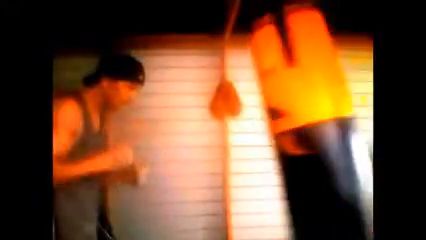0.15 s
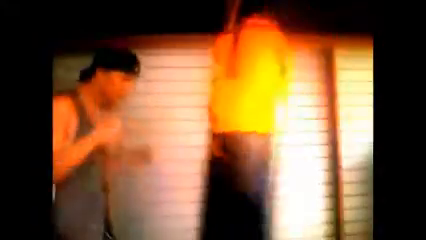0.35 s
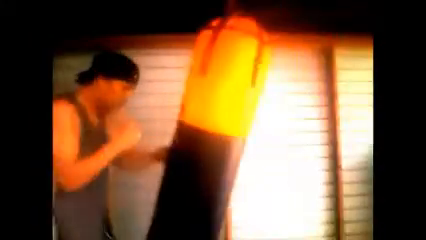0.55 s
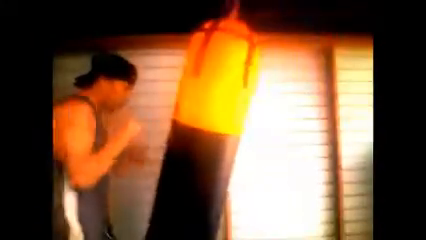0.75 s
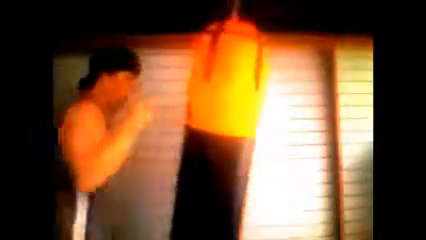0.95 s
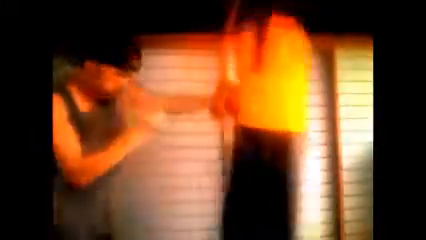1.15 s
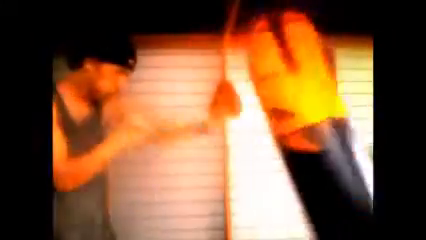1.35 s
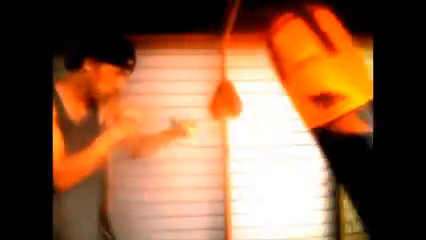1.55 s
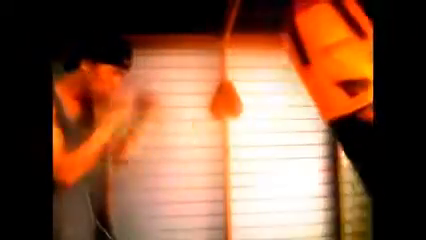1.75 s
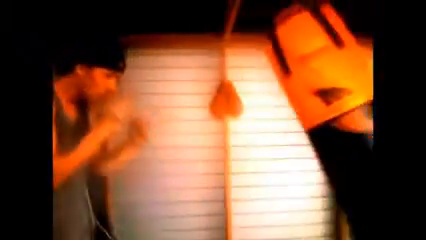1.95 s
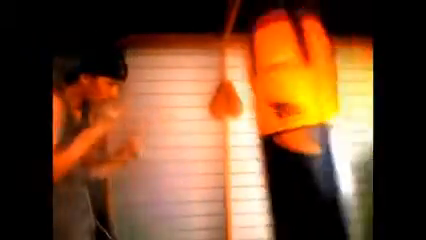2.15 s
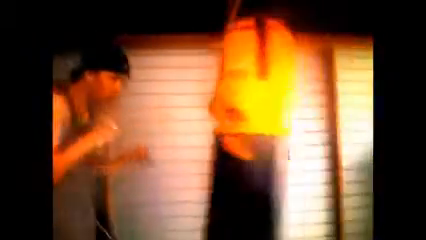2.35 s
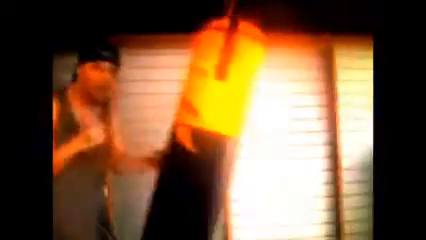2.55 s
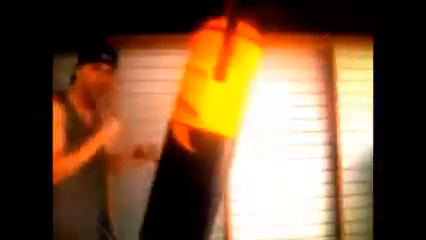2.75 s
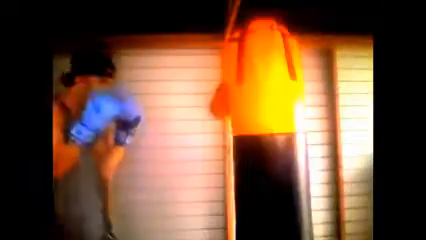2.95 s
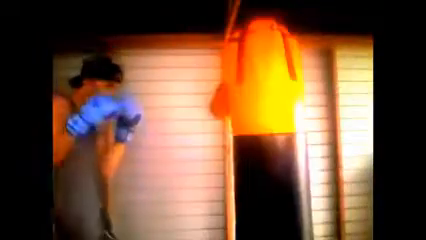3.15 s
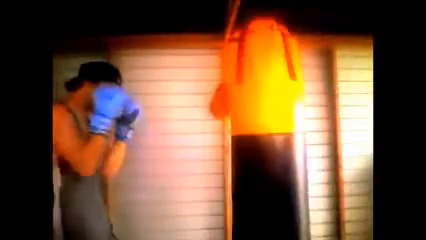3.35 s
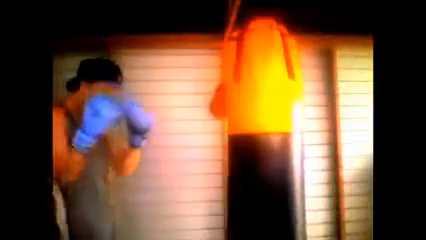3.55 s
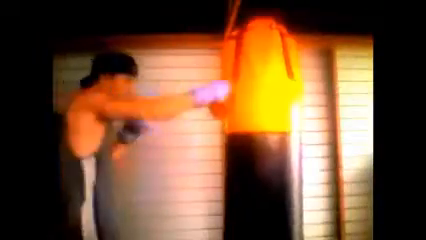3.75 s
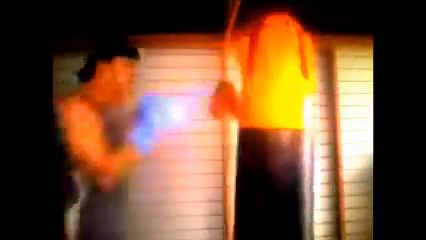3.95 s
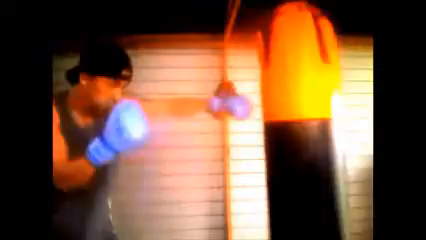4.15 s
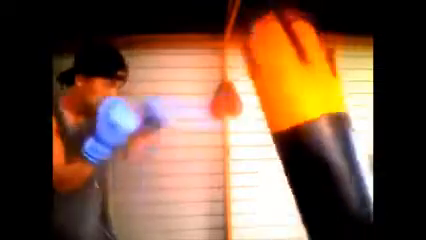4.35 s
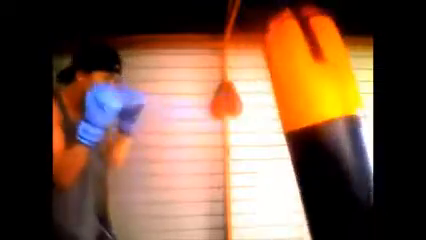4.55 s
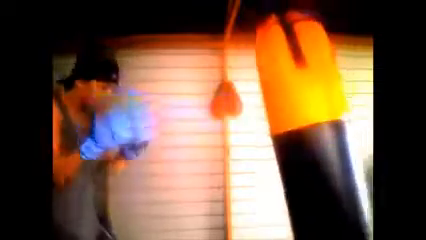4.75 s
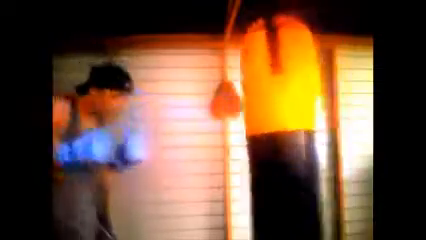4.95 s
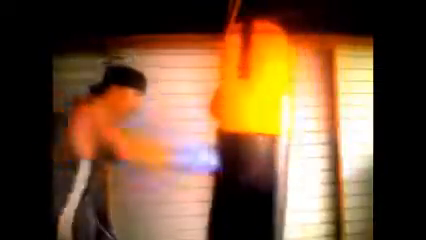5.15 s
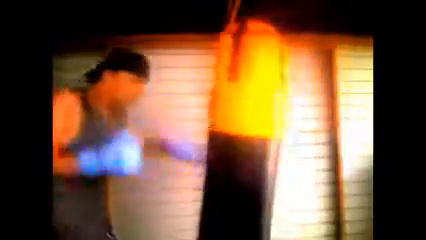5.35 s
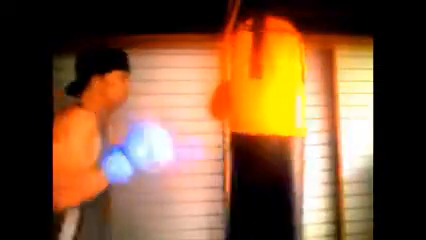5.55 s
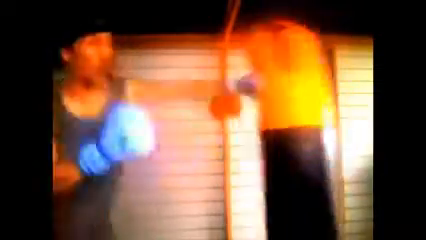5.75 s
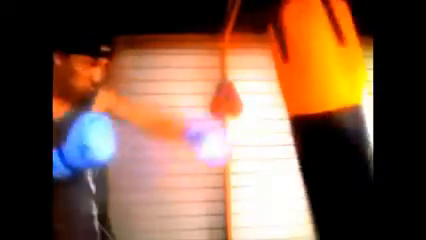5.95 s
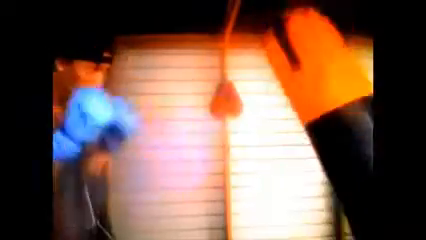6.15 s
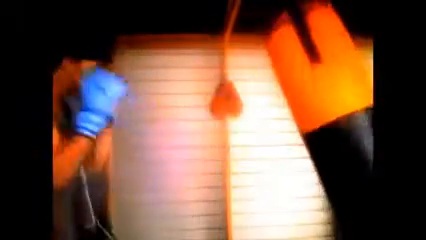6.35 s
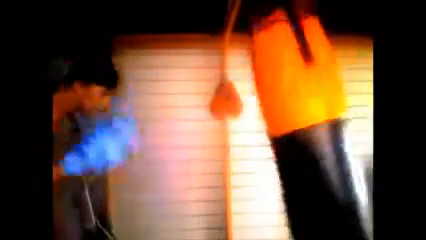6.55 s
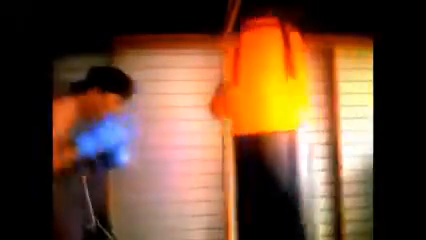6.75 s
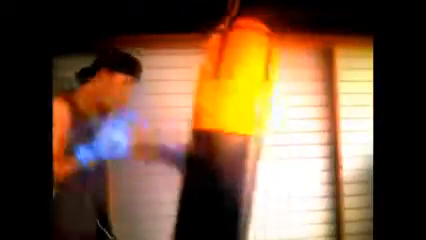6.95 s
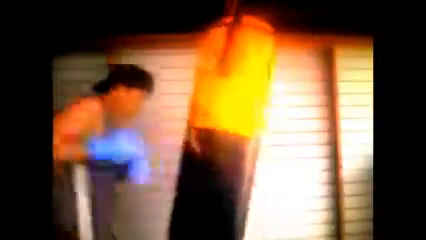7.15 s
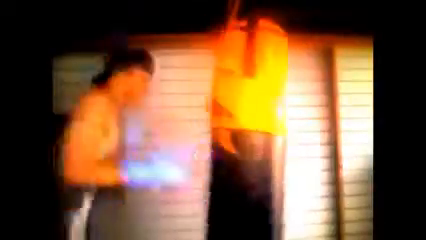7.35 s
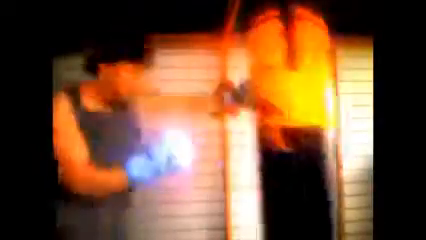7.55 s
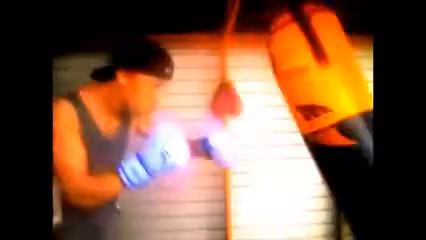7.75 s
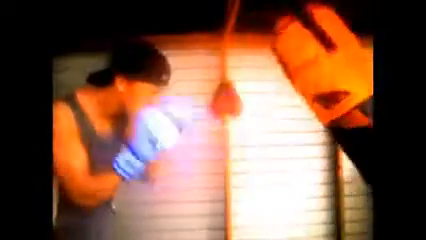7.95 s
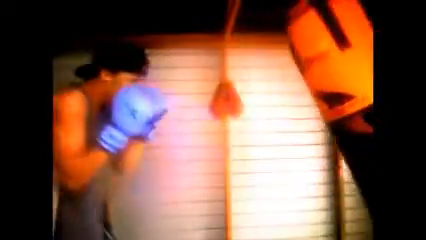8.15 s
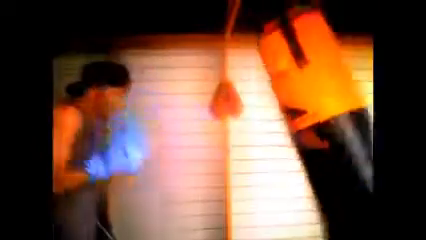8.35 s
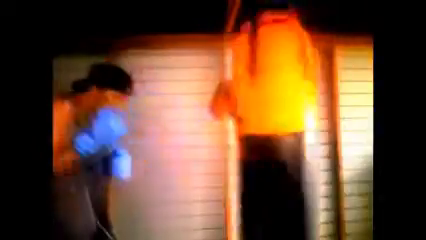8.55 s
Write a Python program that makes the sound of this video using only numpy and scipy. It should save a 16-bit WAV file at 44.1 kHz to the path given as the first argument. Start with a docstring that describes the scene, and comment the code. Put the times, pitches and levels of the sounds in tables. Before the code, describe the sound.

Sharp leather punches with deep booms jolt a heavy bag on its clattering chain; the sound suddenly drops midway, then gradually climbs back.

```python
"""Shoes scuff concrete in a garage, then gloves hit a hanging heavy bag: noise slaps, each with a deep sine boom.
After each blow the bag bounces on its chain, which rattles and clinks as coloured grains and noise.
About 2 s and again 5 s in, the hook squeaks faintly: narrow noise on a gliding pitch.
At 3 s the level drops suddenly and climbs back until 7.3 s, through a low room murmur, more flurries and
dull knocks of bag and hanger. Throughout, air is heard, and a shrill microphone overloads on hard punches."""
import sys
import numpy as np
from scipy import signal
from scipy.fft import rfft, irfft, next_fast_len
from scipy.io import wavfile
from scipy.ndimage import uniform_filter1d

SR = 44100
rng = np.random.default_rng(int(sys.argv[2]) if len(sys.argv) > 2 else 0)


def bounce(signal):
    """Save signal as a 16-bit WAV file at the path given by the first command-line argument."""
    frames = np.transpose(np.atleast_2d(signal))
    limited = np.clip(frames, -1, 1)
    pcm = np.round(limited * 32767).astype(np.int16)
    wavfile.write(sys.argv[1], SR, pcm)


N = 379701
T = np.arange(N) / SR

# Glove on bag: hit_s, force_db, crack_db, slap_db, slap_t60_s, smack_hz (air trapped under the glove),
# bounce_gap_s, first_jolt_db (chain), bounce_damping_db
PUNCHES = [(0.359, -37, -50, -24.5, .21, 1913, 0.048, -42, 21),
           (0.533, -7.5, -29, -9.5, 0.25, 420.2, 0.081, -42, 20),
           (1.155, -5.5, -6, -7, 0.87, 416.7, 0.11, -16, 3.7),
           (2.557, -28, -14, -21, 0.27, 950.3, 0.045, -46, 11.5),
           (3.856, -7.5, -13.5, -13, 0.47, 507, 0.12, -26.5, 0),
           (4.095, 1.5, -7.5, -7, 0.35, 847.8, 0.19, -22, 20),
           (5.256, -11, -17, -6.5, 0.35, 649.4, 0.087, -21.5, 31),
           (5.484, -4.5, -5, -9.5, 0.3, 792, 0.099, -18.5, 17),
           (5.851, 1, -1.5, -11, 0.63, 637.5, 0.1075, -10.5, 2),
           (7.063, -7.5, -8.5, -10.5, 0.4, 399.7, 0.13, -19, 16),
           (7.327, -18, -22, -14, 0.23, 420, 0.11, -16.5, 15),
           (7.558, -6, -10.5, 2, 0.19, 480, 0.1105, -15.5, 3.5)]
# Chain shifting as the bag swings: peak_s, swell_s, level_db, beam_db (rumble of the beam)
SWINGS = [(0.05, .15, -45, -30), (0.80, .05, -42.5, -41.5), (1.419, 0.087, -22, -17),
          (1.665, 0.022, -27, -31), (1.85, 0.02, -41, -32), (2.14, 0.035, -43.5, -38.5),
          (2.785, 0.009, -48, -67), (3.34, 0.062, -39, -33), (3.52, 0.071, -51.5, -44.5),
          (4.602, .19, -46, -28), (5.24, .32, -46.5, -62), (5.78, 0.14, -32, -30), (6.479, .06, -39, -29.5),
          (6.68, 0.014, -35.5, -58), (6.87, 0.038, -41.5, -46), (7.05, 0.076, -39, -58),
          (8.139, 0.043, -31, -41), (8.347, .033, -39.5, -35), (8.56, 0.048, -38, -50)]
# Single links snapping into place: peak_s, level_db, ring_t60_s
CLINKS = [(0.934, -38.5, 0.19), (1.813, -35, 0.17), (2.051, -42.5, 0.13), (2.262, -49, 0.12),
          (2.557, -18.5, .19), (2.723, -45.5, 0.62), (4.845, -38.5, 0.2), (6.039, -21, 0.076),
          (6.156, -17, 0.28), (8.076, -39, 0.34)]
# Shoes landing on concrete: peak_s, level_db, grit_db, hollow_hz (note of the sole)
FOOTFALLS = [(0.223, -27.5, -32.5, 1098), (0.341, -32, -37.5, 1700), (1.01, -37.5, -51, 755.5),
             (1.815, -35, -27.5, 1030), (1.922, -26.5, -53, 1044), (2.526, -33, -39, 1902),
             (2.782, -43, -57, 560), (5.000, -34, -73, 600), (6.596, -34, -44, 720),
             (8.307, -28, -41, 1309)]
# Shoes sliding and pivoting; the loud ones at 5.975, 6.165 and 7.84 s are dull knocks of bag and hanger,
# at 3.48 s a low room murmur near 300 Hz: peak_s, swell_s, level_db, grit_db, hollow_hz
SCUFFS_KNOCKS_MURMUR = [(0.02, 0.033, -31.5, -45, 420), (0.115, .04, -34.5, -46.5, 1080),
                        (0.721, .026, -31, -48, 680), (1.112, .06, -31.5, -51, 740),
                        (1.648, 0.039, -27, -62, 760), (1.755, 0.01494, -31, -47, 519.6),
                        (1.868, .033, -23.5, -33.5, 750), (2.09, .036, -29, -37.5, 540),
                        (2.275, .025, -35, -56, 951.2), (3.25, 0.1028, -35.5, -46, 880),
                        (3.48, .15, -36.5, -47, 298.9), (3.80, .12, -42, -48.5, 540),
                        (4.422, .09, -30, -38, 400), (4.616, .04, -33.5, -45, 450),
                        (4.82, .022, -34, -41.5, 950), (5.975, .045, -8, -17.5, 482.5),
                        (6.165, .02, -15, -21, 850.7), (6.35, .035, -26.5, -38.5, 420),
                        (6.451, .02, -29, -39, 400), (6.852, .017, -37.5, -48, 1300),
                        (7.84, 0.045, -17, -26.5, 500), (7.975, .03, -29.5, -57, 420),
                        (8.136, .063, -27, -38, 600), (8.552, 0.016, -27.5, -37, 740)]
# Hook turning in its eye, one list a squeak: time_s, pitch_hz, level_db (relative)
SQUEAKS = [
    [(2.13, 2410, -48), (2.234, 2700, -48.5), (2.346, 2680, -59), (2.354, 3020, -76), (2.398, 2790, -48),
     (2.424, 2840, -49), (2.45, 2530, -48), (2.53, 2540, -40)],
    [(5.03, 2280, -68), (5.158, 2399, -51), (5.21, 2280, -55)],
]
# Overall level, a sudden drop and an even climb back: time_s, gain
LEVEL_CURVE = [(3.015, 1), (3.035, .03), (3.11, .015), (3.17, .05), (7.3, 1)]

# Spectra, all with columns: frequency_hz, density_db (relative, per Hz)
# wash of the slap in the room
SLAP_SPECTRUM = [(120, -31), (250, -5), (500, -7.5), (800, -13), (1100, -12.5), (1700, -9.5), (2900, -13),
                 (4000, -11.5), (5500, -10.5), (7000, -14), (9000, -17), (11000, -35.5)]
# leather crack on the cover
CRACK_SPECTRUM = [(100, -63), (300, -5), (700, 1.5), (1200, -11), (2500, -4.5), (5000, -20.5), (7500, -9),
                  (11000, -27)]
# low room modes, also the rumble of the beam
THUD_SPECTRUM = [(30, -4), (50, 3.5), (80, 1), (120, -2), (180, -7.5), (260, -12.5), (450, -22),
                 (1500, -67)]
# clothing and glove
CLOTH_SPECTRUM = [(300, -12.5), (1000, -5.5), (3000, -6.5), (7000, -3.5), (11000, -26)]
# clattering links
CHAIN_SPECTRUM = [(150, -29), (350, -12), (600, -7), (1100, -9.5), (1800, -13), (3000, -16.5), (5000, -17),
                  (5700, -11), (6300, -13.5), (7400, -13.5), (9000, -18.5), (11000, -39.5)]
# dull knock of the hanger
KNOCK_SPECTRUM = [(120, -20), (300, 2), (480, 7), (800, 4.5), (1300, -15), (2200, -4), (5000, -122)]
# one snapping link
LINK_SPECTRUM = [(1000, -46), (4500, -31.5), (5600, -14), (6600, -11.5), (7400, -17), (8500, -16),
                 (11000, -57)]
# shoe sole on concrete, also the dull knocks and the murmur
SOLE_SPECTRUM = [(100, 10.5), (300, -9), (520, -3), (800, -9.5), (1200, -10), (1800, -13.5), (3000, -29.5),
                 (6000, -45), (11000, -79)]
# grit under the sole, also the treble of the knocks and the murmur
GRIT_SPECTRUM = [(400, -5), (1500, -7.5), (3000, -4.5), (5000, -2.5), (7000, -11.5), (9000, -17.5),
                 (11000, -48)]
# quiet air of the garage
AIR_SPECTRUM = [(20, 7), (60, -3), (130, -16), (300, -20), (1000, -27), (3000, -35), (7000, -35.5),
                (9000, -38), (11000, -45)]

SMACK_DB = -2.5  # relative to force_db
BOOM_HZ, BOOM_RISE_HZ_PER_DB = 23.7, 0.01  # settled pitch at 0 dB force; harder is slightly higher
THUD_DB, THUD_DB_PER_FORCE_DB = -5.5, 0.87  # level at 0 dB force; growth
SWISH_DB, SWISH_SWELL_S, SWISH_T60_S = -29.5, 0.038, 0.08  # level relative to crack_db
JOLT_SWELL_S, JOLT_T60_S, JOLT_BEAM_DB = 0.049, 0.25, -1  # beam relative to the chain
SWING_T60_S = 0.3
FOOTFALL_SWELL_S, FOOTFALL_T60_S = 0.002584, 0.2
STOP_T60_S, STOP_T60_PER_SWELL = 0.22, 3.5  # a longer swell takes longer to stop
AIR_DB = -44.5
MIC_HZ, MIC_WIDTH_HZ, MIC_PEAK_DB = 7227, 510, 16
OVERLOAD_DB = -0.3
BAND_HZ, TOP_HZ = 11300, 16000  # low-passes before and after the final clip


def slaps(attack_s=0.00048, crack_t60_s=0.067, smack_t60_s=0.25, smack_width_hz=900):
    """Leather cracks on the cover, air trapped under the glove smacks, the room answers with a wash."""
    hit_s, force_db, crack_db, slap_db, slap_t60_s, smack_hz, *_ = np.transpose(PUNCHES)
    crack = swells(np.broadcast(hit_s, attack_s, crack_t60_s, crack_db))
    smack = swells(np.broadcast(hit_s, attack_s, smack_t60_s, force_db + SMACK_DB))
    wash = swells(np.broadcast(hit_s, attack_s, slap_t60_s, slap_db))
    pocket = resonance(held(hit_s - attack_s, smack_hz), smack_width_hz)
    room = colour(grains(rate_per_s=1200, spread_db=0.0), SLAP_SPECTRUM)
    return crack * noise(CRACK_SPECTRUM) + smack * pocket + wash * room


def booms(build_s=0.052, t60_s=0.58, stiffening=0.44, relax_s=0.036, upper_hz=43, upper_db=-9, gain=3.0):
    """Each blow rocks bag and building; pitch starts high while the filling is squeezed, then sags."""
    out = np.zeros(N)
    for hit_s, force_db, *_ in PUNCHES:
        start = int(hit_s * SR)
        t = T[:N - start][:2 * SR]
        settled_hz = BOOM_HZ + BOOM_RISE_HZ_PER_DB * force_db
        cycles = settled_hz * (t + stiffening * relax_s * (1 - np.exp(-t / relax_s)))
        upper = undb(upper_db) * np.sin(2 * np.pi * (upper_hz * t + rng.random()))
        envelope = undb(force_db) * (1 - np.exp(-t / build_s)) * undb(-60 * t / t60_s)
        out[start:start + len(t)] += gain * envelope * (upper - np.sin(2 * np.pi * cycles))
    return out


def thuds(swell_s=0.0057, t60_s=0.47):
    """Low room modes fill a moment after each punch, then ring down."""
    rows = [(hit_s + swell_s, swell_s, t60_s, THUD_DB + THUD_DB_PER_FORCE_DB * force_db)
            for hit_s, force_db, *_ in PUNCHES]
    return swells(rows) * noise(THUD_SPECTRUM)


def swishes():
    """Clothing and glove rustle as the arm shoots out, louder before a louder crack."""
    rows = [(hit_s, SWISH_SWELL_S, SWISH_T60_S, crack_db + SWISH_DB) for hit_s, _, crack_db, *_ in PUNCHES]
    return swells(rows) * noise(CLOTH_SPECTRUM)


def bounces(count=4):
    """Bag bounces at even gaps, level falling with the square of the count: (peak_s, level_db)."""
    return [(hit_s + (k + 1) * gap_s, jolt_db - damping_db * k ** 2)
            for hit_s, *_, gap_s, jolt_db, damping_db in PUNCHES for k in range(count)]


def chain(beam_t60_s=0.99, sway_db=-2, knock_db=-8):
    """Links clatter in dense bursts as the bag jumps; the hanger knocks dully and shakes its beam."""
    clatter = contacts(CHAIN_SPECTRUM, rate_per_s=600, spread_db=0.5, wet_db=7.0, t60_s=0.18)
    knocks = undb(knock_db) * contacts(KNOCK_SPECTRUM, rate_per_s=62, spread_db=4, wet_db=6.0, t60_s=0.047)
    uneven_knocks = knocks * lumps(rate_per_s=60, depth_db=2.5)
    rattles = [(s, JOLT_SWELL_S, JOLT_T60_S, db, db + JOLT_BEAM_DB) for s, db in bounces()]
    rattles += [(s, swell_s, SWING_T60_S, db, beam_db) for s, swell_s, db, beam_db in SWINGS]
    shaking = swells([row[:4] for row in rattles])
    beam = swells([(s, swell_s, beam_t60_s, beam_db) for s, swell_s, _, _, beam_db in rattles])
    sway = undb(sway_db) * noise([(12, -26), (22, 11), (36, -11), (60, -15), (200, -101)])
    return shaking * (clatter + uneven_knocks) + beam * (noise(THUD_SPECTRUM) + sway)


def clinks(attack_s=0.00017, tick_t60_s=0.0053, tick_db=5):
    """One link snaps: a bright tick and its ring in the room."""
    ring = swells([(s, attack_s, t60_s, db) for s, db, t60_s in CLINKS])
    tick = swells([(s, attack_s, tick_t60_s, db + tick_db) for s, db, _ in CLINKS])
    return np.hypot(ring, tick) * noise(LINK_SPECTRUM)


def floor_events():
    """Landings, scuffs, knocks, murmur by time: (peak_s, swell_s, t60_s, level_db, grit_db, hollow_hz)."""
    landings = [(s, FOOTFALL_SWELL_S, FOOTFALL_T60_S, db, grit_db, hz) for s, db, grit_db, hz in FOOTFALLS]
    others = [(s, swell_s, STOP_T60_S + STOP_T60_PER_SWELL * swell_s, db, grit_db, hz)
              for s, swell_s, db, grit_db, hz in SCUFFS_KNOCKS_MURMUR]
    return sorted(landings + others)


def footwork_knocks_and_murmur(hollow_db=-5, hollow_width_hz=370, sole_db=3.0):
    """Soles stick and slip over grit, each with a hollow note; dull knocks and a murmur share the noises."""
    events = floor_events()
    peak_s, swell_s, *_, hollow_hz = np.transpose(events)
    hollow = undb(hollow_db) * resonance(held(peak_s - swell_s * 1.4, hollow_hz), hollow_width_hz)
    sole = undb(sole_db) * contacts(SOLE_SPECTRUM, rate_per_s=240, spread_db=2, wet_db=0.5, t60_s=0.13)
    grit = contacts(GRIT_SPECTRUM, rate_per_s=390, spread_db=4.0, wet_db=3.0, t60_s=0.12)
    body_level = swells([row[:4] for row in events])
    grit_level = swells([(*row[:3], row[4]) for row in events])
    return body_level * (sole + hollow) + grit_level * grit


def squeak(width_hz=170, gain_db=-1):
    """Steel rubs on steel: one rough, gliding partial."""
    out = np.zeros(N)
    for curve in SQUEAKS:
        time_s, pitch_hz, level_db = np.transpose(curve)
        tone = resonance(np.interp(T, time_s, pitch_hz), width_hz)
        level = undb(np.interp(T, time_s, level_db) + gain_db)
        out += tone * level * (T > time_s[0]) * (T < time_s[-1])
    return out


def room_air():
    """Quiet air: steady coloured noise."""
    return undb(AIR_DB) * noise(AIR_SPECTRUM)


def undb(db):
    """Decibels to gain."""
    return 10 ** (np.asarray(db) / 20)


def colour(x, points):
    """Give a white signal the spectrum of (Hz, dB) points, at rms 1."""
    point_hz, point_db = np.transpose(points)
    size = next_fast_len(N)
    hz = np.maximum(np.fft.rfftfreq(size, 1 / SR), 1)
    gain = undb(np.interp(np.log(hz), np.log(point_hz), point_db))
    y = irfft(rfft(x, size) * gain, size)[:N]
    return y / np.std(y)


def noise(points):
    """Coloured noise at rms 1."""
    return colour(rng.standard_normal(N), points)


def grains(rate_per_s, spread_db):
    """Random tiny contacts of scattered size and sign; rms 1."""
    hits = rng.random(N) < rate_per_s / SR
    signs = rng.choice([-1, 1], N)
    sizes = undb(spread_db * np.clip(rng.standard_normal(N), -2, 2))
    x = hits * signs * sizes
    return x / np.std(x)


def contacts(points, rate_per_s, spread_db, wet_db, t60_s):
    """Grains of one colour; each leaves a short cloud of reflections off the near walls."""
    x = grains(rate_per_s, spread_db)
    keep = undb(-120 / (t60_s * SR))  # power kept per sample
    cloud = np.sqrt(signal.lfilter([1 - keep], [1, -keep], x ** 2)) * rng.standard_normal(N)
    return colour(x + undb(wet_db) * cloud, points)


def swells(rows):
    """Envelope of (peak_s, swell_s, t60_s, level_db) rows; their powers add."""
    power = np.zeros(N)
    for peak_s, swell_s, t60_s, db in rows:
        span = slice(max(int((peak_s - 4 * swell_s) * SR), 0), int((peak_s + 2 * t60_s) * SR))
        t = T[span] - peak_s
        shape = np.exp(np.where(t < 0, -(t / swell_s) ** 2, -np.log(1000) * t / t60_s))
        power[span] += (undb(db) * shape) ** 2
    return np.sqrt(power)


def resonance(hz, width_hz):
    """Noise ringing in one resonance whose centre follows hz; rms 1."""
    smoothing = signal.butter(2, width_hz / 2, fs=SR, output="sos")
    flutter = signal.sosfilt(smoothing, rng.standard_normal((2, N)))
    carrier = np.exp(2j * np.pi * np.cumsum(hz) / SR)
    tone = np.real((flutter[0] + 1j * flutter[1]) * carrier)
    return tone / np.std(tone)


def held(times_s, values):
    """Each value holds from its time until the next."""
    return np.asarray(values)[np.maximum(np.searchsorted(np.sort(times_s), T) - 1, 0)]


def lumps(rate_per_s, depth_db):
    """Uneven gain: random levels, each held 1 / rate_per_s and slewed."""
    hold = int(SR / rate_per_s)
    levels = np.repeat(rng.standard_normal(N // hold + 1), hold)
    return undb(depth_db * uniform_filter1d(levels, hold)[:N])


def lowpass(x, hz):
    """Steep low-pass without phase shift."""
    return signal.sosfiltfilt(signal.ellip(6, 0.1, 45, hz, fs=SR, output="sos"), x)


def scene():
    """Everything in the garage, over its quiet air."""
    punches = slaps() + booms() + thuds() + swishes()
    return (punches + chain() + clinks() + footwork_knocks_and_murmur() + squeak() + room_air())[None]


def record(dry, droop_hz=7):
    """Microphone rings in the treble and overloads: a big boom chops up the slap riding on it."""
    ring = signal.lfilter(*signal.iirpeak(MIC_HZ, MIC_HZ / MIC_WIDTH_HZ, fs=SR), dry)
    limit = undb(OVERLOAD_DB)
    drive = (dry + undb(MIC_PEAK_DB) * ring) / limit
    flat = limit * drive / (1 + drive ** 6) ** (1 / 6)
    # the coupling capacitor lets the flat tops sag
    sagged = signal.sosfilt(signal.butter(1, droop_hz, "high", fs=SR, output="sos"), flat)
    levelled = lowpass(sagged, BAND_HZ) * np.interp(T, *np.transpose(LEVEL_CURVE))
    return lowpass(np.clip(levelled, -1, 1), TOP_HZ)


dry = scene()
out = record(dry)
bounce(out)
```